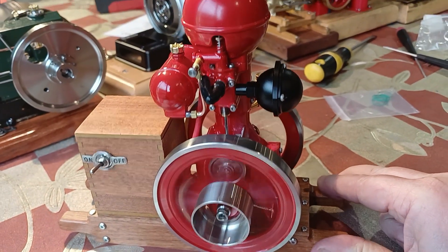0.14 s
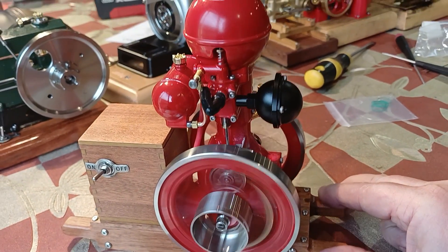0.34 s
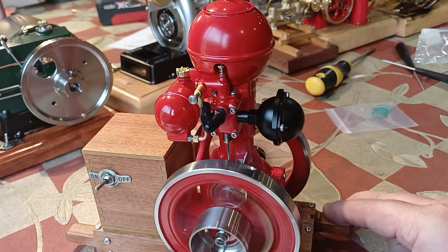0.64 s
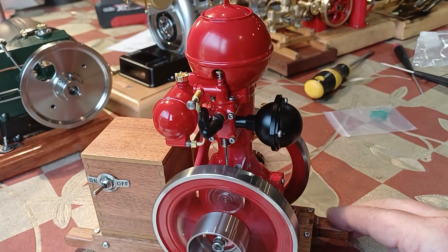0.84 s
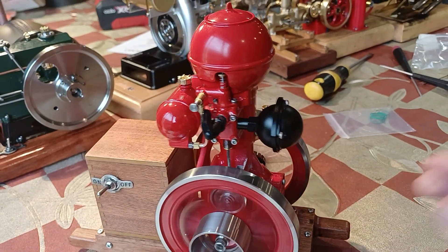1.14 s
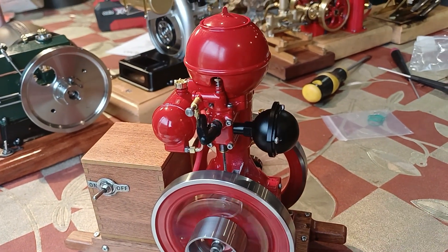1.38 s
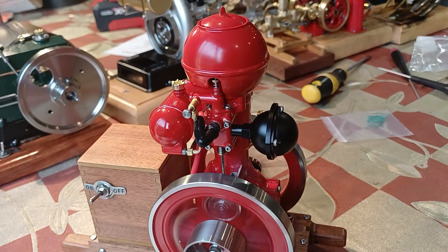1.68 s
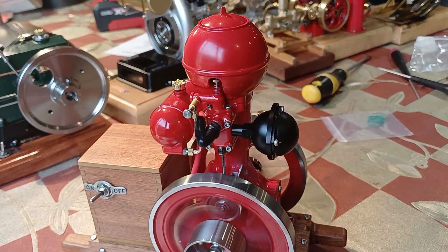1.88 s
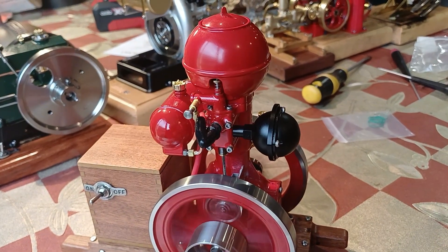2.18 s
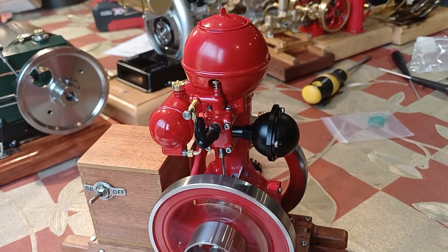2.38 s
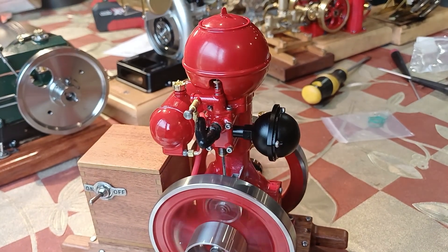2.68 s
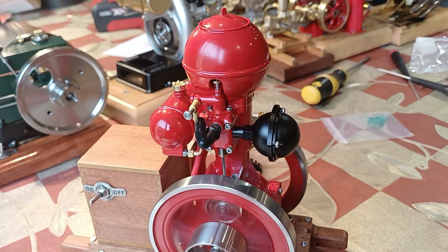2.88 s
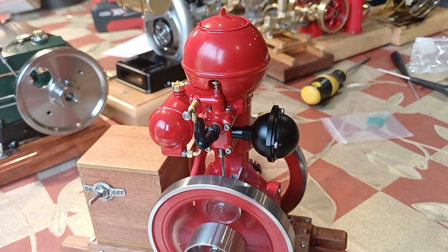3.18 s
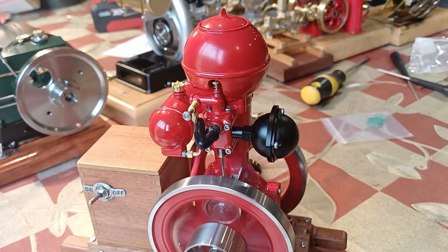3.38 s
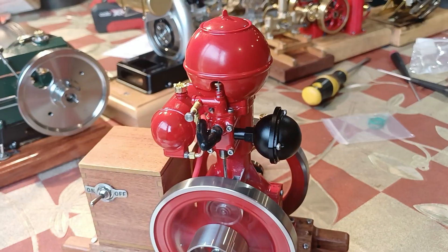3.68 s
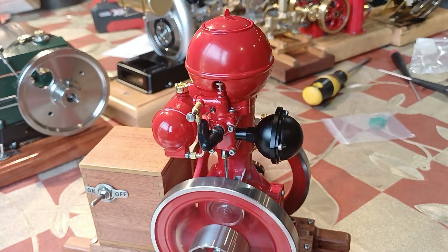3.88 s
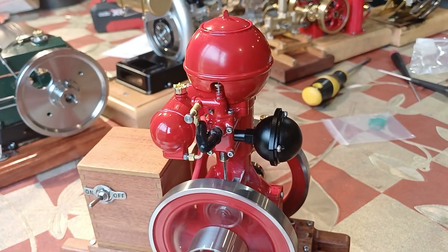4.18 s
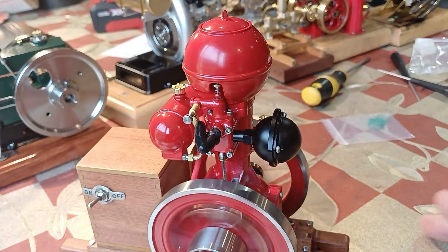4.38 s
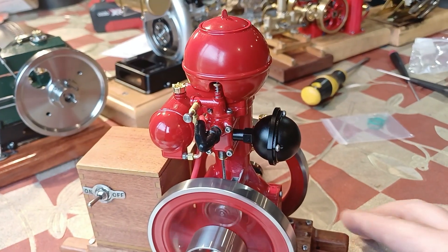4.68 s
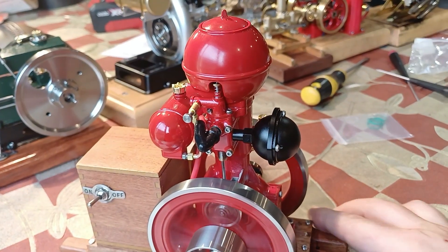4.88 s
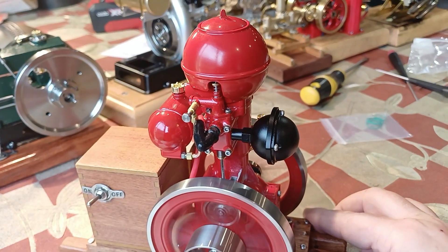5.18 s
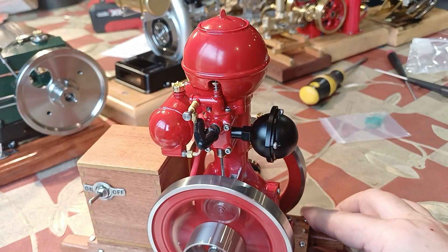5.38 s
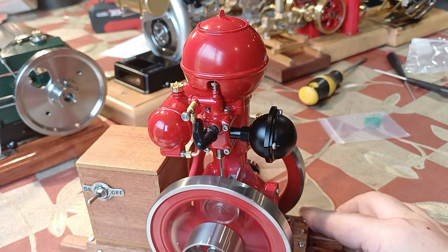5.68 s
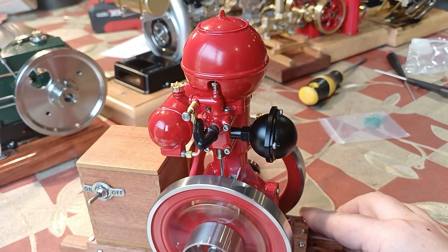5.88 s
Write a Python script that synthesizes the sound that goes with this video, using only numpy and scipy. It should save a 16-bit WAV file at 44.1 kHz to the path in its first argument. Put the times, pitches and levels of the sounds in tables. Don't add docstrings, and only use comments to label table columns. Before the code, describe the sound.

Model single-cylinder engine running indoors on a bench, firing irregularly with hard thumping pops, a fluttering intake snort before each, light metallic rattle filling the gaps.

```python
import sys
import numpy as np
from scipy import signal
from scipy.fft import rfft, irfft, next_fast_len
from scipy.io import wavfile
from scipy.ndimage import uniform_filter1d

SR = 44100
rng = np.random.default_rng(int(sys.argv[2]) if len(sys.argv) > 2 else 0)


def convert_level_to_amplitude(level_db):
    exponent = np.asarray(level_db, float) / 20
    return 10 ** exponent


def master(y):
    cut = np.clip(np.atleast_2d(y).T, -1, 1)
    pcm = np.round(cut * 32767)
    wavfile.write(sys.argv[1], SR, pcm.astype(np.int16))


N = 266364
T = np.arange(SR // 4) / SR

# first_clack_s, last_clack_s, clack_db, puff_db, tick_db
COASTING_SPELLS = [(0.0416, 0.306, -31.5, -35, -21), (0.4137, 0.4151, -45, -52, -34),
                   (0.464, 0.6129, -32.5, -32, -23), (0.758, 1.095, -31, -30.5, -20.5),
                   (1.214, 1.2148, -44, -36, -23), (1.3228, 1.727, -30.5, -33, -23),
                   (1.776, 2.243, -30, -29, -22.5), (2.387, 2.387, -32, -40, -28),
                   (2.4968, 2.9383, -31, -29, -27.5), (3.0845, 3.536, -30.5, -28.5, -29),
                   (3.6863, 4.036, -31.5, -34.5, -22), (4.1612, 4.1612, -48, -48, -25),
                   (4.2723, 4.5914, -30.5, -32, -25.5), (4.639, 4.8896, -30, -30.5, -22.5),
                   (5.0372, 5.483, -30.5, -34, -24.5), (5.634, 5.6804, -32, -31, -25),
                   (5.8167, 5.861, -27, -33, -23.5), (5.987, 6.0285, -29.5, -33.5, -27)]
STROKE_COUNTS = [6, 1, 4, 8, 1, 10, 10, 1, 10, 10, 8, 1, 8, 6, 10, 2, 2, 2]
# first_snap_s, snort_db, hiss_db
INTAKE_STROKES = [(0.32, -21, -21.5), (0.6253, -25.5, -23.5), (1.1041, -25, -23), (1.2010, -26.5, -36),
                  (2.2569, -21.5, -21.5), (2.363, -27.5, -22.5), (2.9487, -22, -21.5), (3.5482, -24.5, -21),
                  (4.0468, -24.5, -25), (4.1480, -30, -24), (4.9015, -23, -21), (5.493, -23, -23),
                  (5.6916, -25.5, -25), (5.87, -26, -23)]
# start_s, level_db
LATCH_CLICKS = [(0.346, -17), (0.6494, -16), (1.1296, -15.5), (1.224, -20), (2.2837, -19), (2.388, -17.5),
                (2.9764, -22.5), (3.575, -22), (4.0735, -17.5), (4.171, -18.5), (4.9267, -17.5),
                (5.5209, -15.5), (5.715, -20), (5.892, -15.5)]
# start_s, thud_db, rasp_db, knock_db, compression_hiss_db
FIRING_STROKES = [(0.382, -8.5, -19.5, -17.5, -15.5), (0.683, -12, -17, -12, -25),
                  (1.1624, -11, -14, -13.5, -20.5), (1.2568, -22, -29, -26, -24),
                  (2.3197, -12, -17, -20, -21.5), (2.4238, -44, -29, -21.5, -26),
                  (3.009, -13, -16.5, -14, -24), (3.6086, -11, -13, -11, -22),
                  (4.1069, -10.5, -10, -11, -20.5), (4.203, -20.5, -26, -22, -34),
                  (4.9607, -8.5, -11.5, -23, -17), (5.5500, -14.5, -34, -18, -32),
                  (5.5570, -12, -28, -23, -48), (5.7477, -13, -21, -27, -20.5),
                  (5.9248, -8.5, -40, -14, -25)]
# start_s, pop_db, blast_db, base_ring_db
EXHAUST_OPENINGS = [(0.401, -6, -7, -33), (0.6998, -7, -8.5, -17.5), (1.179, -9, -11, -12),
                    (1.269, -10.5, -11.5, -37), (2.3382, -7.5, -5, -9.5), (2.4358, -10, -8, -25),
                    (3.0266, -7.5, -9.5, -13), (3.6264, -6, -5.5, -11), (4.1247, -7.5, -8, -13.5),
                    (4.2171, -7.5, -9.5, -34), (4.9788, -7.5, -5.5, -11.5), (5.5731, -8, -7.5, -17),
                    (5.761, -7.5, -10, -18), (5.9357, -5.5, -8.5, -19)]
# middle_s, length_s, level_db
PISTON_SQUEAKS = [
    (0.383, .008, -31),
    (0.693, .012, -28),
    (1.17, .01, -26),
    (2.38, .02, -40),
    (3.06, .02, -27),
    (3.665, .02, -38),
    (4.143, .015, -26),
    (4.97, .007, -34),
    (4.997, 0.018, -31),
]

# pitch_hz, width_hz, level_db
INTAKE_PIPE_TONES = [(200, 68, -3.5), (368, 250, -7), (756, 200, -6), (2230, 530, 3.5)]
MUFFLER_TONES = [(1614, 370, -6), (2306, 270, 4.5), (2637, 216, 1.5), (3885, 71, -4.5)]
# pitch_hz, width_hz, level_db
LINKAGE_TONES = [(1740, 610, -3.5), (3470, 880, -4.5), (4540, 1060, -5.5), (6930, 240, -2), (7510, 275, -5),
                 (11500, 620, -7.5), (14600, 52, -1), (16300, 3400, -7.5)]
# pitch_hz, width_hz, level_db
TAPPET_TONES = [(7600, 1700, -20.5), (11000, 65, -7), (12480, 3000, -6), (15400, 83, -4),
                (15300, 1100, -19)]
# pitch_hz, width_hz, level_db
ROD_TONES = [(815, 450, -6.5), (1323, 74, 2.5), (1585, 142, -1)]
# pitch_hz, width_hz, level_db
SLEEVE_TONES = [(3750, 490, 0)]
# pitch_hz, width_hz, level_db
PIN_TONES = [(11790, 45, 0), (14650, 40, -5), (14840, 40, -7)]
# pitch_hz, width_hz, level_db
BENCH_TONES = [(73, 23, -26.5), (110, 18, -6.5), (146.4, 13, -2.5), (222.4, 24.5, -3.5), (360, 53, -14.5),
               (800, 280, -23.5)]
# pitch_hz, width_hz, level_db
FAR_FAST_TONES = [(1210, 100, 0)]
# pitch_hz, width_hz, level_db
FAR_SLOW_TONES = [(1020, 89, 0)]

# pitch_hz, level_db (per Hz)
BLAST_COLOUR = [(300, 10), (800, -5), (1500, 0.5), (2400, 9.5), (3000, 4.5), (4500, 1), (6500, -11),
                (9000, -11.5), (12000, 2.5), (15500, -2.5)]
# pitch_hz, level_db (per Hz)
KNOCK_COLOUR = [(300, 1), (700, 3.5), (1500, -7.5), (2400, 3), (4500, -1.5), (6500, -9.5), (9000, -11.5),
                (12000, -14), (15500, 2.5)]
# pitch_hz, level_db (per Hz)
WHIRR_COLOUR = [(24, -50), (40, -6), (209, -10.5), (751, -3), (1180, -9.5), (1300, 0.5), (1850, -6),
                (2320, -0.5), (2910, -2.5), (3930, -2.5), (5310, -20), (7000, -11), (8990, -22),
                (11600, -10), (16000, -21.5)]

# pitch_hz, likeness (0-1)
PORT_LIKENESS = [(60, 0.73), (300, 1), (800, 0.96), (2000, 0.48), (5000, 0.22), (15000, 0.19)]
# pitch_hz, level_db
LEFT_LOUDER = [(60, 2), (150, 0), (300, 2), (600, -1), (1200, 1), (2400, 1), (5000, 1), (9000, 1.1),
               (14000, -0.5)]
# pitch_hz, phase_rad
LEFT_AHEAD = [(100, 0), (1290, .9), (2240, .1), (2900, 1.9), (3880, 1.3), (6800, 3.3), (10500, 1.3),
              (15000, 1.6)]
# pitch_hz, level_db
TREBLE_TONE = [(4800, -0.98), (5600, 2), (6400, 2.5), (8300, 1.5), (9200, -2.5), (10300, -1)]
# pitch_hz, decay_s
ROOM_DECAY = [(60, 0.5), (150, 0.13), (400, 0.35), (2000, 0.17), (10000, 0.34)]


def unit(x):
    return x / np.sqrt(np.mean(x ** 2) + 1e-20)


def along(points, hz):
    f, v = np.transpose(points)
    return np.interp(np.log(hz + 1), np.log(f + 1), v)


def filtered(x, response):
    m = next_fast_len(N + SR // 2)
    spectrum = rfft(x, m) * response(np.fft.rfftfreq(m, 1 / SR))
    return irfft(spectrum, m)[..., :N]


def colour(points):
    return lambda f: convert_level_to_amplitude(along(points, f))


def modes(table):
    def response(f):
        total = 0
        for k, (center, width, db) in enumerate(table):
            damping = 1j * f * width
            total = total + (-1) ** k * convert_level_to_amplitude(db) * damping / (center * center - f * f + damping)
        return total
    return response


def played(times, gains, shape):
    at = np.clip(np.round(np.asarray(times) * SR).astype(int), 0, N - 1)
    return signal.fftconvolve(np.bincount(at, gains, N), shape)[:N]


def swell(rise, fall):
    shape = (1 - np.exp(-T / rise)) ** 2 * np.exp(-T / fall)
    return shape / shape.max()


def noisy(envelope, response, grit_db):
    grit = convert_level_to_amplitude(grit_db * unit(uniform_filter1d(rng.standard_normal(N), size=30)))
    level = np.sqrt(np.mean(abs(response(np.linspace(1, SR / 2, 2000))) ** 2))
    noise = unit(grit * rng.standard_normal((2, N)))
    return filtered(envelope * noise, response) / level


def coasting():
    s, length, lead_db, clack_db, puff_db, tick_db = strokes()
    lag = .206 * length
    scatter = rng.standard_normal((len(s), 7)).T

    out = played(s - 1.065 * lag, convert_level_to_amplitude(puff_db), swell(.0073, .0038))
    back = played(s + 1.28 * lag, convert_level_to_amplitude(-40.5 + 2 * scatter[0]), swell(.0053, .0049))
    sigh = played(s + 2.3 * lag, convert_level_to_amplitude(-45 + 2.5 * scatter[1]), swell(.003, .005))
    air = noisy(out + back, modes(MUFFLER_TONES), grit_db=3) + noisy(sigh, modes(SLEEVE_TONES), grit_db=1.5)

    lead = played(s - .98 * lag, convert_level_to_amplitude(lead_db + 4.5), swell(.0004, .0097))
    lead += played(s - 1.095 * lag, convert_level_to_amplitude(lead_db + 6), swell(.00047, .00075))
    clack = played(s - .22 * lag, convert_level_to_amplitude(clack_db + 1), swell(.001, .0074))
    knock = played(s + .022 * lag, convert_level_to_amplitude(clack_db - 3.5), swell(.0014, .0038))
    linkage = noisy(lead + clack, modes(LINKAGE_TONES), grit_db=4) + noisy(knock, modes(ROD_TONES), grit_db=-.5)

    click = swell(.0001, .0005) + .1 * swell(.0003, .004)
    ticks = played(s + lag - .0004, convert_level_to_amplitude(tick_db - .5), click)
    gear_clicks = [(.23, -1), (.63, 4), (1.8, -27), (2.65, -10)]  # (share of the lag, dB)
    for (angle, db), chance in zip(gear_clicks, scatter[2:6]):
        ticks += played(s + angle * lag, convert_level_to_amplitude(clack_db + db + 2.5 * np.tanh(chance)), click)
    pins = played(s, convert_level_to_amplitude(tick_db - 15 + 3.5 * np.tanh(scatter[6])), swell(.0021, .0069))
    steel = noisy(ticks, modes(TAPPET_TONES), grit_db=-2) + noisy(pins, modes(PIN_TONES), grit_db=8)
    return air + steel + linkage


def strokes():
    slowing, limp_s = 1.0145, .0007
    rows = []
    for (first, last, *levels), count in zip(COASTING_SPELLS, STROKE_COUNTS):
        k = np.arange(count)
        late = (count - 1 - k) % 2
        share = (slowing ** k - 1) / max(slowing ** (count - 1) - 1, 1e-9)
        s = first + (last - first) * share + 2 * limp_s * late * (k > 0)
        rows += [(when, off, *levels) for when, off in zip(s, late)]
    s, late, clack_db, puff_db, tick_db = np.transpose(rows)

    gaps = np.diff(s, prepend=-1, append=9)
    length = np.minimum(np.minimum(gaps[1:], gaps[:-1]) + .0006, .054)
    longer_ms = 1000 * (length - .049)

    since = s[:, None] - np.transpose(EXHAUST_OPENINGS)[0]
    settle_db = -2 * ((since > 0) & (since < .07)).any(axis=1)
    lead_db = -40 + late * np.minimum(-6.5 - longer_ms, 0)
    clack_db = clack_db + .09 * longer_ms + settle_db
    puff_db = puff_db + settle_db / 2
    tick_db = tick_db - .34 * longer_ms
    spread_db = np.array([[2.5], [.8], [2], [2.8]])
    chance = 1.6 * spread_db * np.tanh(rng.standard_normal((len(s), 4))).T
    return (s, length, *([lead_db, clack_db, puff_db, tick_db] + chance))


def thuds():
    out_s, pop_db, _, ring_db = np.transpose(EXHAUST_OPENINGS)
    rocking = np.zeros(N + len(T))
    cycle = 2 * np.pi * 123 * T
    shape = (np.sin(cycle) - .15 * np.sin(2 * cycle)) * (1 - np.exp(-T / .001)) * np.exp(-T / .04)
    for s, thud_db, *_ in FIRING_STROKES:
        freed = out_s[np.searchsorted(out_s, s)] - s
        fade = 1 / (1 + np.exp((T - freed) / .0015))
        rocking[round(s * SR):][:len(T)] -= convert_level_to_amplitude(thud_db - 1) * shape * fade

    u = T - .008
    pulse = -np.cos(2 * np.pi * 200 * u + .089) * np.exp(-(u / .003) ** 2)
    pop = played(out_s - .008, convert_level_to_amplitude(pop_db), pulse)
    ring = np.sin(2 * np.pi * 116 * T) * swell(.00078, .019)
    ring += .27 * np.sin(2 * np.pi * 228 * T) * swell(.0018, .015)
    return rocking[:N] + pop + played(out_s + .0014, convert_level_to_amplitude(ring_db - .5), ring)


def gas():
    s, _, rasp_db, knock_db, squeeze_db = np.transpose(FIRING_STROKES)
    out_s, _, blast_db, _ = np.transpose(EXHAUST_OPENINGS)
    rasp = played(s - .001, convert_level_to_amplitude(rasp_db), swell(.00092, .0037))
    squeeze = played(s - .03, convert_level_to_amplitude(squeeze_db), np.exp(-((T - .027) / .005) ** 2))
    knock = played(s - .0015, convert_level_to_amplitude(knock_db + 1), swell(.0008, .0034))
    blast = played(out_s - .008, convert_level_to_amplitude(blast_db), np.exp(-((T - .0083) / .0029) ** 2))
    blast += played(out_s, convert_level_to_amplitude(blast_db - 24), swell(.0027, .013))

    rough = noisy(squeeze + knock, colour(KNOCK_COLOUR), grit_db=4.5)
    rough = rough + noisy(blast, colour(BLAST_COLOUR), grit_db=4)
    return noisy(rasp, lambda f: modes(MUFFLER_TONES)(f) ** 2, grit_db=2.5) + rough


def intake():
    s, snort_db, hiss_db = np.transpose(INTAKE_STROKES)
    # (delay s, snort dB, click dB)
    flutter = [(0, -3, -3), (.0074, .1, -1.5), (.0149, -3, 1.5), (.0222, -8, -4), (.0296, -14, -9)]
    suction, clicks = np.zeros((2, N))
    for late, low_db, click_db in flutter:
        suction -= played(s + late - .0012, convert_level_to_amplitude(snort_db + low_db + 19), swell(.00012, .0013))
        clicks += played(s + late - .001, convert_level_to_amplitude(snort_db + click_db - 2), swell(.00018, .0016))
    hiss = played(s, convert_level_to_amplitude(hiss_db - 4.5), swell(.005, .019))
    air = noisy(clicks, colour(KNOCK_COLOUR), grit_db=-3) + noisy(hiss, colour(BLAST_COLOUR), grit_db=6)
    return filtered(suction, modes(INTAKE_PIPE_TONES)), air


def latch():
    s, db = np.transpose(LATCH_CLICKS)
    snap = played(s, convert_level_to_amplitude(db - 7), swell(.0002, .0008))
    rebound = played(s + .0029, convert_level_to_amplitude(db - 10.5), swell(.0012, .012))
    return noisy(snap + rebound, modes(TAPPET_TONES), grit_db=6.5)


def squeaks():
    t = np.arange(N) / SR
    envelope = sum(convert_level_to_amplitude(db) * np.exp(-((t - s) / length) ** 2) for s, length, db in PISTON_SQUEAKS)
    return noisy(envelope, modes([(15000, 76, 0)]), grit_db=4)


def whirr():
    return convert_level_to_amplitude(-42.5) * noisy(np.ones(N), colour(WHIRR_COLOUR), grit_db=6)


def bench():
    out_s, pop_db, *_ = np.transpose(EXHAUST_OPENINGS)
    snap_s, snort_db, _ = np.transpose(INTAKE_STROKES)
    shake = played(out_s, convert_level_to_amplitude(pop_db - 28), swell(.0011, .053))
    shake += played(snap_s, convert_level_to_amplitude(snort_db - 3), swell(.0011, .016))
    earlier = convert_level_to_amplitude(-50) * np.exp(-np.arange(N) / SR / .14)
    return noisy(shake + earlier, modes(BENCH_TONES), grit_db=-1)


def room(x):
    hz, t, z = signal.stft(rng.standard_normal((2, SR // 2)), SR, nperseg=512)
    decay_s = np.clip(along(ROOM_DECAY, hz), .03, 2)[:, None]
    tail = signal.istft(z * convert_level_to_amplitude(-60 * t / decay_s), SR, nperseg=512)[1]
    late = np.pad(x, ((0, 0), (300, 0)))
    return signal.fftconvolve(late, tail / np.linalg.norm(tail[0]), axes=1)[:, :N]


def far_machine():
    t = np.arange(N) / SR
    end_s = .6
    fade = convert_level_to_amplitude(-48) / (1 + np.exp((t - end_s) / .058))
    sunk = np.clip(t / end_s, 0, 1)
    fast = noisy(fade * np.sqrt(1 - sunk), modes(FAR_FAST_TONES), grit_db=1)
    return fast + noisy(fade * np.sqrt(sunk), modes(FAR_SLOW_TONES), grit_db=-1)


def spread(hz):
    turn = np.arccos(np.clip(along(PORT_LIKENESS, hz), -1, 1)) / 2
    return np.array([np.cos(turn), np.sin(turn)])


def scene():
    snort, suck = intake()
    engine = coasting() + suck + latch() + gas() + squeaks() + whirr()
    mid, side = filtered(engine + bench() + far_machine(), spread)
    bright = 1.187 * np.array([mid + side, mid - side])
    low = np.array([snort + thuds()] * 2)
    tail = room(low)
    low_room = convert_level_to_amplitude(-8) * tail.mean(0) + convert_level_to_amplitude(-31) * tail
    return low + bright + low_room + convert_level_to_amplitude(-12.5) * room(bright)


def roll_off(x):
    return signal.sosfilt(signal.butter(12, 16400, fs=SR, output="sos"), x)


def record(dry):
    def phone(hz):
        halves = np.array([[.5], [-.5]])
        ports = convert_level_to_amplitude(along(LEFT_LOUDER, hz) * halves) * np.exp(1j * along(LEFT_AHEAD, hz) * halves)
        band = hz ** 4 / (48 ** 4 + hz ** 4) * (hz < 15900)
        return ports * convert_level_to_amplitude(along(TREBLE_TONE, hz)) * band
    x = filtered(dry, phone)
    x = x / (1 + abs(x) ** 8) ** (1 / 8)
    return roll_off(x)


dry = scene()
out = record(dry)
master(out)
```